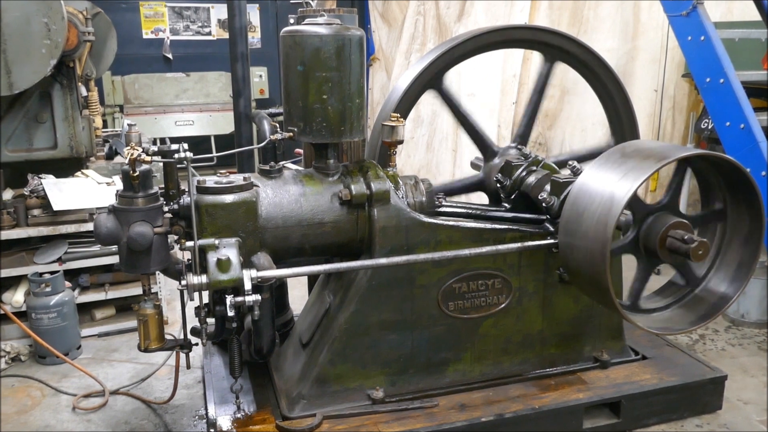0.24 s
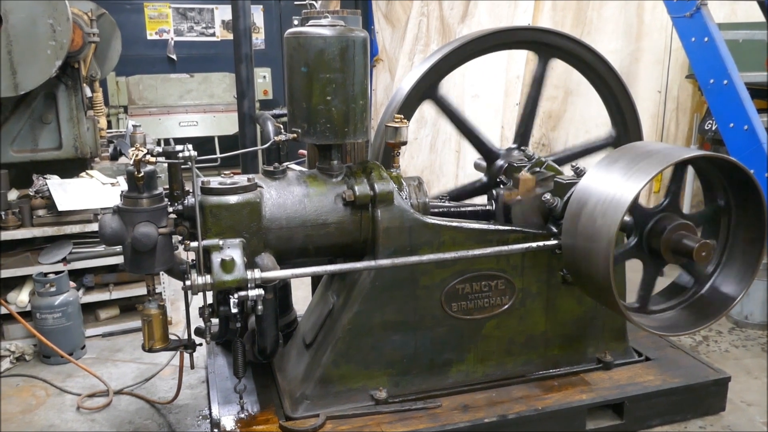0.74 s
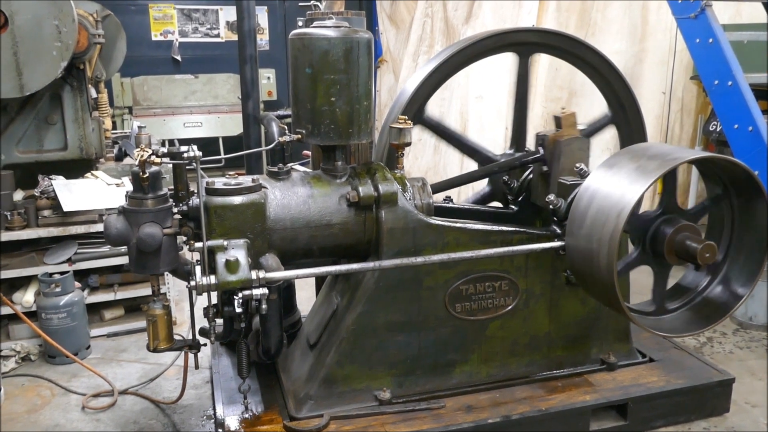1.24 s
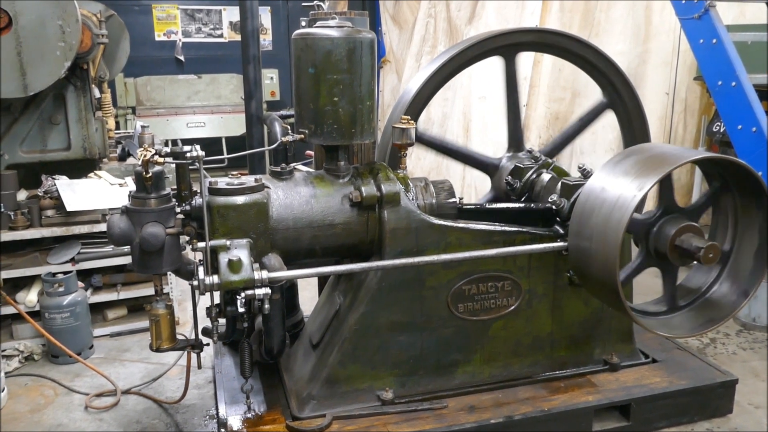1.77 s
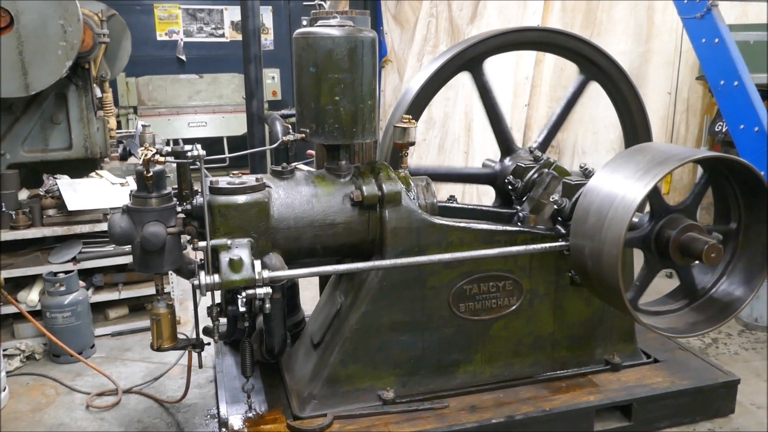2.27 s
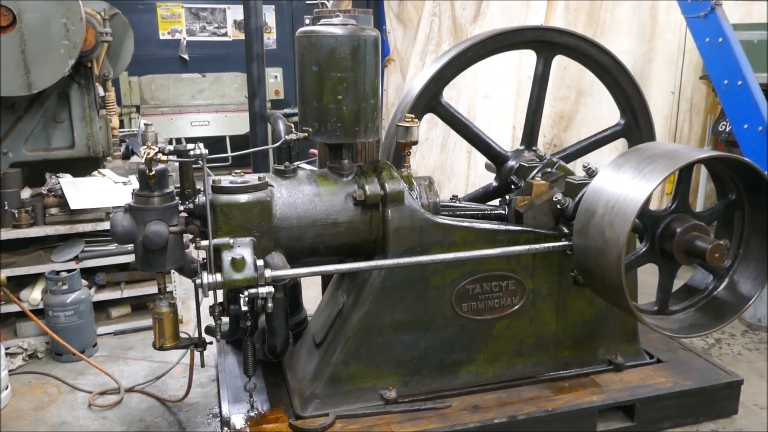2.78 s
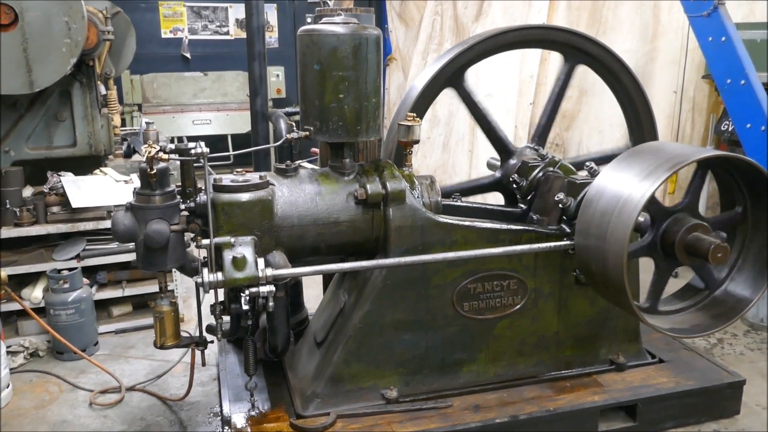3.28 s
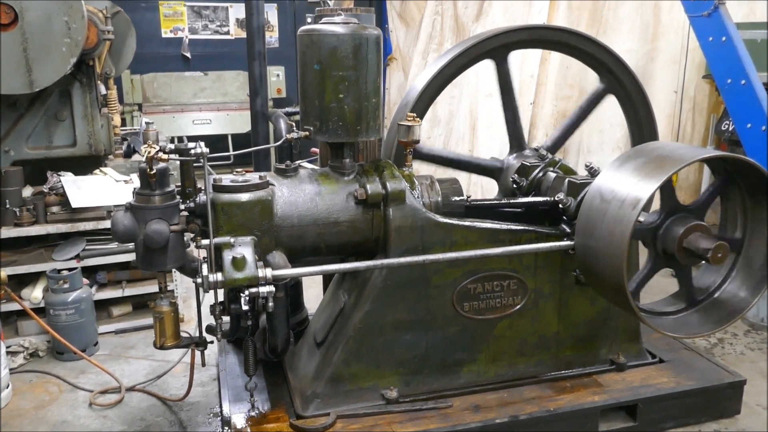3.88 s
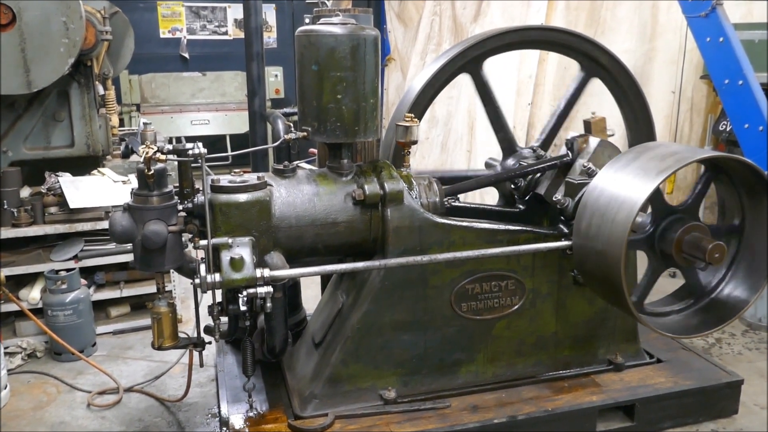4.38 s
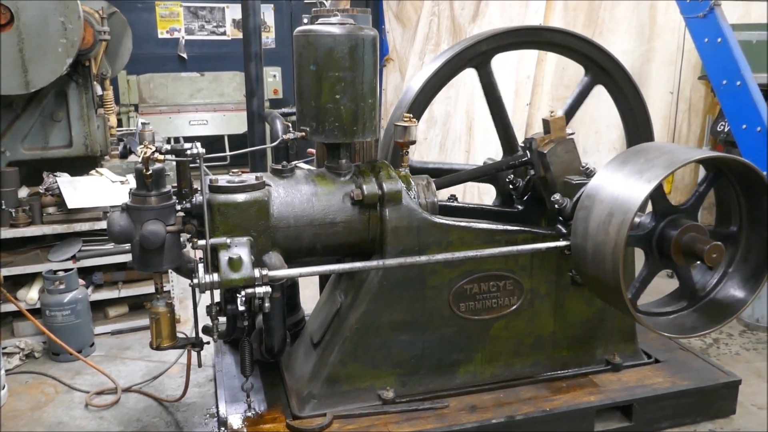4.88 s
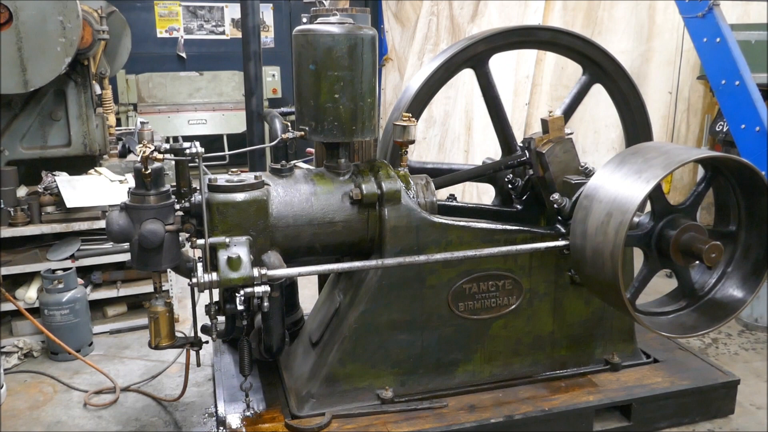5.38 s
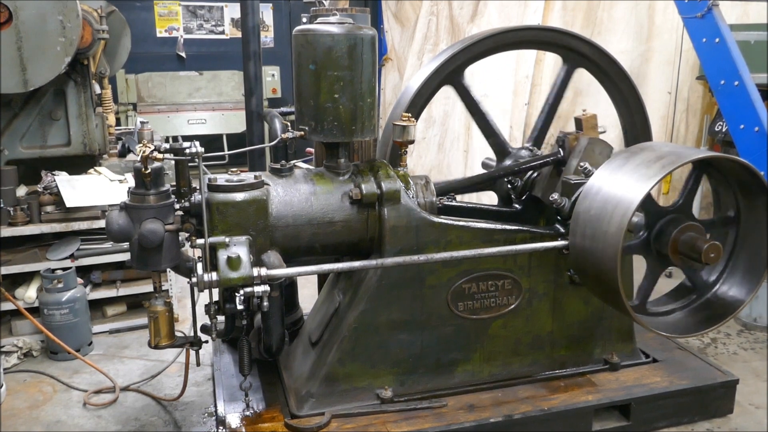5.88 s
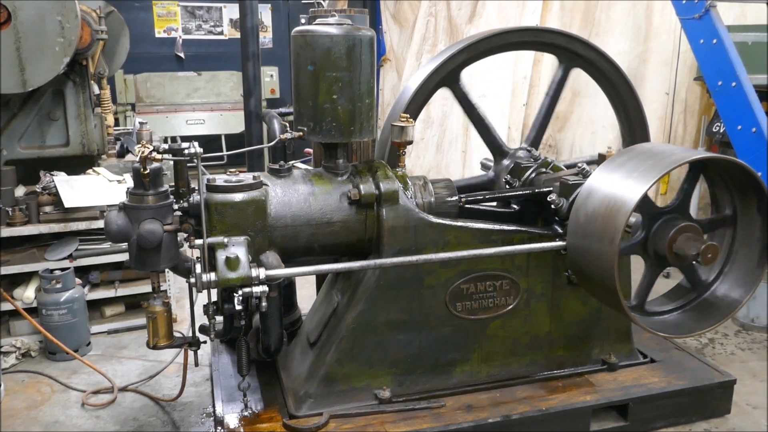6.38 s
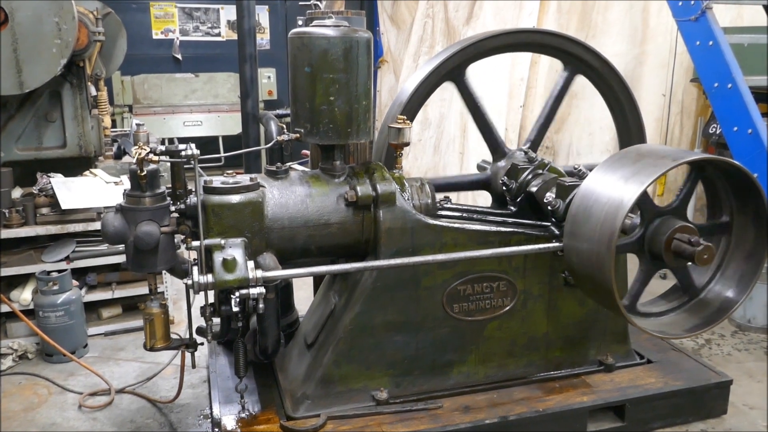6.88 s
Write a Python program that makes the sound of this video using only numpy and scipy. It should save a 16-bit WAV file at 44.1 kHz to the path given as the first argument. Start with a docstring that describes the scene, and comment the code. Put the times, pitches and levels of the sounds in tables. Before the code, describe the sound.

One loud metal clank, then uneven wheezy puffs, a juddering thump and soft knocks from a slowly rocking iron engine in an echoing workshop.

```python
"""Iron engine in a workshop

A big single-cylinder engine rocks slowly against the air squeezed inside it. Air wheezes and chuffs
through the valve ports and a leak hisses thinly. The linkage clanks, small parts tick, weight thumps
onto the engine's bed and the bearings knock. The hall draws every sound out over its steady hum."""
import sys
import numpy as np
from scipy import signal
from scipy.fft import rfft, irfft, next_fast_len
from scipy.io import wavfile
from scipy.ndimage import uniform_filter1d

SR = 44100
rng = np.random.default_rng(int(sys.argv[2]) if len(sys.argv) > 2 else 0)


def to_wav(s):
    """Save 16-bit WAV."""
    ch = np.atleast_2d(s).T  # columns
    pcm = np.round(np.clip(ch, -1, 1) * 32767)  # PCM
    wavfile.write(sys.argv[1], SR, pcm.astype(np.int16))


N = 314874


def gain_of(db):
    """Turns decibels into a number to multiply by."""
    return 10 ** (np.asarray(db) / 20)


def evened(x):
    """Scales a signal to an average strength (rms) of 1."""
    return x / np.sqrt(np.mean(x ** 2) + 1e-20)


def read(points, hz):
    """Looks up the value at a pitch, sliding between a table's rows."""
    pitches, values = np.transpose(points)
    return np.interp(np.log(hz + 1), np.log(pitches + 1), values)


def coloured(x, colour):
    """Turns each pitch in x up or down by the factor colour(hz)."""
    size = next_fast_len(x.shape[-1])
    return irfft(rfft(x, size) * colour(np.fft.rfftfreq(size, 1 / SR)), size)[..., :x.shape[-1]]


def noise(colour, size=N):
    """Random noise of strength 1 in the given tone colour."""
    return evened(coloured(rng.standard_normal(size), colour))


def curve(points):
    """A tone colour drawn through rows of pitch_hz, level_db."""
    return lambda hz: gain_of(read(points, hz))


def resonant(peaks, body, body_db):
    """A tone colour with peaks standing out of a broad body."""
    def colour(hz):
        peak_power = sum(gain_of(2 * db) / (1 + (2 * (hz - pitch) / width) ** 2) ** 2
                         for pitch, width, db in peaks)
        return np.sqrt(gain_of(read(body, hz) + body_db) ** 2 + peak_power)
    return colour


def wobble(ms):
    """A random wobble of strength 1 that changes within about ms milliseconds."""
    size = max(round(ms * SR / 1000), 2)
    return evened(uniform_filter1d(uniform_filter1d(rng.standard_normal(N), size), size))


def swell(start, rise, hold, fade_db_per_s):
    """Power that swells, holds, then fades away."""
    t = np.arange(N) / SR - start
    rising = np.clip(t / max(rise, .002), 0, 1) ** 2
    return (rising * gain_of(-fade_db_per_s * np.maximum(t - rise - hold, 0))) ** 2


def ring(notes, t, swell_s=0.04):
    """Ringing iron: tones swell in and die. Here and below, decay_s is the time to fall 60 dB."""
    tones = sum(gain_of(db - 60 * t / decay_s) * np.sin(2 * np.pi * hz * t) for hz, db, decay_s in notes)
    return tones * (1 - np.exp(-t / swell_s))


def add(mix, start_s, sound):
    """Mixes a sound in at its start time."""
    part = mix[round(start_s * SR):][:len(sound)]
    part += sound[:len(part)]


# Pitches the valve ports favour: pitch_hz, width_hz, level_db
PORT_PEAKS = [(695, 45, -6.5), (1180, 57, -3.5), (1414, 150, -3.5), (1604, 220, -7.5), (2195, 300, -11),
              (2565, 167, -6), (3770, 410, -16.5), (4470, 150, -21.5), (4724, 270, -15.5),
              (5370, 140, -21.5)]
# The rush of air between those peaks: pitch_hz, level_db
PORT_RUSH = [(180, -20), (300, -5.5), (675, -1.5), (923, -0.5), (1420, 2), (2540, -2.5), (3010, -7.5),
             (4610, -8.5), (7370, -27.5), (9000, -33), (11700, -41), (19800, -120)]
PORT_COLOUR = resonant(PORT_PEAKS, PORT_RUSH, body_db=-7)
# Tone of the shaking frame: pitch_hz, level_db
FRAME_RUMBLE = [(20, -18), (40, -11), (65, -6), (90, -25.5), (113, 1), (151, -2.5), (230, 5.5), (320, -5),
                (700, 1), (1000, -7.5), (1600, -92)]
# Pushes of the piston: start_s, rise_s, hold_s, fade_db_per_s, air_db, rumble_db
PUSHES = [(0.0, 0.0014, 0.0033, 135, -30, -33.5), (0.17, 0.046, 0.0086, 300, -46.5, -59),
          (0.381, .01, 0.0042, 114, -42.5, -44.5), (0.9, 0.044, 0.043, 63, -35, -37),
          (1.039, 0.078, 0.006, 221, -29.5, -38), (1.202, 0.04, 0.12, 502, -31.5, -37.5),
          (1.39, 0.086, 0.0046, 65, -35, -38), (2.28, 0.028, 0.19, 65, -41.5, -56.5),
          (2.7, .12, 0.097, 38, -49.5, -53.5), (3.354, 0.018, 0.0044, 117, -43, -44.5),
          (3.59, 0.074, .005, 168, -28, -33.5), (3.732, 0.079, .005, 150, -31.5, -53),
          (6.161, 0.095, 0.0043, 283, -38.5, -36.5)]

def wheezes():
    """Each push of the piston drives swirling air through the ports and shakes the frame."""
    air_power, rumble_power = sum(swell(*row[:4]) * gain_of(row[4:])[:, None] ** 2 for row in PUSHES)
    swirl = rng.standard_normal(N) * gain_of(1.37 * wobble(ms=7.6))
    air = evened(coloured(swirl, PORT_COLOUR))
    return np.sqrt(air_power) * air + np.sqrt(rumble_power) * noise(curve(FRAME_RUMBLE))


# Hiss of a wide gap: pitch_hz, level_db
WIDE_GAP = [(5000, -7), (7000, -2.5), (9000, 0.5), (10500, 3.5), (12000, -8.5), (15500, -23)]
# Faint whistles in that hiss: pitch_hz, width_hz, level_db
GAP_WHISTLES = [(9030, 180, 7), (10100, 150, -7.5), (11700, 140, 2.5)]
# Brighter hiss of a narrow gap: pitch_hz, level_db
NARROW_GAP = [(8000, -25), (10500, 3), (12500, 5), (13800, 6), (15500, -11)]
# Puffs of the leak: start_s, rise_s, hold_s, fade_db_per_s, level_db, brightness (0 to 1)
LEAK_PUFFS = [(0.0, 0.0014, .005, 200, -52, 0.03), (0.073, 0.073, .005, 195, -56.5, .2),
              (0.377, .012, .005, 92.5, -54.5, 0.15), (0.921, 0.04, .03, 170, -38, .1),
              (1.028, 0.091, 0.0056, 234, -35, 0.12), (1.193, 0.044, 0.12, 201, -39.5, 0.1),
              (1.405, 0.026, 0.039, 97, -44.5, 0.1), (1.585, 0.033, .01, 152, -56, .4),
              (2.284, 0.013, 0.008, 151.5, -49.5, .3), (2.33, 0.033, 0.21, 23, -60, 0.26),
              (2.65, 0.15, 0.09, 58, -58, .3), (3.363, .04, .005, 130, -52.5, .4),
              (3.584, 0.036, .01, 200, -40, 0.12), (3.635, 0.018, .01, 260, -38, 0.3),
              (3.705, 0.077, .005, 100, -48, 0.16), (6.157, 0.035, .03, 202, -52, 0.44),
              (6.27, 0.022, .02, 151, -56, 0.4), (6.4, 0.026, .005, 293, -55, 0.93)]

def leak():
    """Air escapes in fluttering puffs; brighter ones use more of the narrow gap."""
    narrow_power = wide_power = 0
    for *timing, db, brightness in LEAK_PUFFS:
        power = swell(*timing) * gain_of(db) ** 2
        narrow_power += power * brightness
        wide_power += power * (1 - brightness)
    wide = np.sqrt(wide_power) * noise(resonant(GAP_WHISTLES, WIDE_GAP, body_db=0))
    narrow = np.sqrt(narrow_power) * noise(curve(NARROW_GAP))
    return (wide + narrow) * gain_of(1.9 * wobble(ms=5.4))


# Tone of the workshop's hum: pitch_hz, level_db
SHOP_HUM = [(15, -80.5), (25, -34), (69, -36.5), (86, -4.5), (119, -10.5), (152, -3.5), (365, -8),
            (618, -8), (838, -10.5), (1010, -7.5), (1390, -16.5), (2560, -23), (3200, -41), (4160, -72.5),
            (7040, -120)]
# Tone of the faint background hiss: pitch_hz, level_db
FAINT_HISS = [(1760, -32), (3000, -4), (3350, 1), (4320, -1), (5920, -8), (6610, -10), (8350, -8),
              (9780, 0.5), (15500, -6)]
HUM_DB, HISS_DB = -53.5, -73.5

def hum():
    """The shop's hum, drifting a little, and a steady hiss, for the middle and the sides."""
    shop = gain_of(HUM_DB) * noise(curve(SHOP_HUM), (2, N))
    hiss = gain_of(HISS_DB) * noise(curve(FAINT_HISS), (2, N))
    return shop * gain_of(.7 * wobble(ms=90)) + hiss


# Pitches the linkage favours: pitch_hz, width_hz, level_db
LINKAGE_PEAKS = [(242, 35, 1), (524, 173, 1), (809, 25, -16), (1049, 9.9, -3.5), (1290, 72, -2),
                 (1499, 77, -8.5), (2103, 150, -6), (3500, 54, -25)]
# Broad tone of its rattle: pitch_hz, level_db
LINKAGE_TONE = [(47, -64), (80, -31), (109, -10.5), (234, -4.5), (318, -11.5), (363, 2), (833, -7),
                (1010, -4.5), (2400, -15.5), (3200, -23), (5980, -39), (15000, -47)]
# Notes of the flywheel: pitch_hz, level_db, decay_s
FLYWHEEL_NOTES = [(233, 9.5, 1.3), (410, -15, 0.96), (479, 2.5, 0.34), (960, -20, 0.57), (1257, -0.5, 0.45),
                  (1635, -7.5, 0.74), (1960, -7.5, 0.9)]
# Clanks of the linkage: start_s, crack_db, rattle_db, rattle_decay_s, ring_db
LINKAGE_CLANKS = [(0.388, -42, -59, 0.16, -81), (0.392, -35.5, -48, 0.12, -71.5),
                  (0.5446, -8.5, -16, 0.45, -37), (3.374, -37, -39, 0.46, -70.5)]

def clanks():
    """The linkage cracks sharply; its joints rattle on, the bass blooms later and the flywheel rings."""
    out, t = np.zeros(N), np.arange(32768) / SR
    click = signal.unit_impulse(512, 140)
    crack = coloured(click, lambda hz: np.exp(-(np.log((hz + 1) / 1750) / .38) ** 2))
    clatter = 1 + 4.4 * np.exp(-t / 0.0091)  # the first bounces are the hardest
    for start_s, crack_db, rattle_db, decay_s, ring_db in LINKAGE_CLANKS:
        joints = noise(resonant(LINKAGE_PEAKS, LINKAGE_TONE, body_db=0.92), len(t))
        bass = coloured(joints, lambda hz: 1 / (1 + (hz / 1200) ** 4))
        treble = (joints - bass) * clatter * (1 - np.exp(-t / 0.00099))
        rattle = treble + bass * (1 - np.exp(-(t / 0.025) ** 2))
        add(out, start_s, gain_of(crack_db) * crack / abs(crack).max())
        add(out, start_s, gain_of(rattle_db - 60 * t / decay_s) * rattle)
        add(out, start_s, gain_of(ring_db) * ring(FLYWHEEL_NOTES, t))
    return out


# Light ticks of loose parts: start_s, level_db, pitch_hz, decay_s
PART_TICKS = [(0.869, -60.5, 8900, 0.36), (2.163, -61.5, 11000, 0.12), (4.784, -57, 11900, 0.14),
              (4.95, -59.5, 5000, 0.056), (5.596, -74, 8950, 0.071)]

def ticks():
    """Small loose parts touch: a crisp start and a short fizz."""
    out, t = np.zeros(N), np.arange(4096) / SR
    crisp_start = 1 + 1.15 * np.exp(-t / 0.0021)
    for start_s, db, pitch_hz, decay_s in PART_TICKS:
        fizz = noise(lambda hz: np.exp(-(np.log((hz + 1) / pitch_hz) / 0.65) ** 2), len(t))
        add(out, start_s, gain_of(db - 60 * t / decay_s) * fizz * crisp_start)
    return out


# Notes of the valve, relative to its chuff: pitch_hz, level_db, decay_s
VALVE_NOTES = [(1431, -4, 0.15), (2605, -13.5, .15), (4740, -13.5, .1)]
# Chuffs of air: start_s, level_db, rise_s, length_s, brightness_db_per_octave
AIR_CHUFFS = [(0.9684, -19.5, 0.0032, 0.026, 2.5), (1.054, -22.5, 0.0058, 0.023, 1.5),
              (1.115, -18, 0.0082, 0.018, 7.5), (1.256, -25, 0.011, 0.052, 4.5),
              (1.342, -20, .007, 0.018, 11), (1.4286, -26.5, 0.0037, 0.033, 4.5),
              (1.505, -32, 0.0077, 0.054, 4.5), (1.641, -32, 0.0073, 0.045, -0.5),
              (3.636, -22.5, 0.0063, 0.039, 4), (3.797, -31.5, 0.0041, 0.061, -0.5),
              (4.077, -34, .01, 0.031, -7), (6.218, -30.5, 0.0058, 0.063, 1), (6.262, -44, .005, 0.028, 9),
              (6.332, -38, 0.0023, 0.084, -2)]

def chuffs():
    """A valve rings as it lets a short burst of air out through the ports."""
    out, t = np.zeros(N), np.arange(8192) / SR
    for start_s, db, rise_s, length_s, brightness in AIR_CHUFFS:
        burst = noise(lambda hz: PORT_COLOUR(hz) * gain_of(brightness * np.log2((hz + 50) / 2000)), len(t))
        shape = (1 - np.exp(-(t / rise_s) ** 2)) * np.exp(-(t / length_s) ** 1.64)
        add(out, start_s, gain_of(db) * (shape * burst + ring(VALVE_NOTES, t, rise_s)))
    return out


# Pitches the bed (the engine's base) favours: pitch_hz, width_hz, level_db
BED_PEAKS = [(150, 37, -28), (416, 380, 1.5), (890, 330, 2), (1610, 18, -33.5), (1880, 130, -12),
             (2176, 98, -9), (2450, 290, -17.5)]
# Broad tone of the bed: pitch_hz, level_db
BED_TONE = [(35, -58), (60, -21), (143, 9), (303, -6), (396, 9.5), (561, -7), (857, -4), (1260, -10),
            (4850, -39), (6000, -47), (7800, -61), (13200, -120)]
# Notes of the bed after a landing: pitch_hz, level_db, decay_s
BED_NOTES = [(145.7, -8, 0.91), (353.6, 0.5, 0.57), (390.5, 12, 0.2)]
# Thumps: start_s, landing_db, judder_db, judder_length_s, brightness_db_per_octave
BED_THUMPS = [(2.279, -26.5, -23.5, 0.243, 2), (4.096, -46, -59, 0.018, 1), (4.429, -56, -51, 0.04, 4)]

def thumps():
    """The weight lands on the bed, which judders for a moment and rings."""
    out, t = np.zeros(N), np.arange(SR) / SR
    bed = resonant(BED_PEAKS, BED_TONE, body_db=-1.5)
    for start_s, landing_db, judder_db, length_s, brightness in BED_THUMPS:
        landing = gain_of(landing_db) * t / 0.008 * np.exp(1 - t / 0.011)
        judder = gain_of(judder_db - 49 * t) * (1 - np.exp(-t / 0.0034))
        judder *= np.clip((length_s - t) / 0.018, 0, 1)
        thud = noise(lambda hz: bed(hz) * gain_of(brightness * np.log2((hz + 50) / 400)), len(t))
        add(out, start_s, np.hypot(landing, judder) * thud + gain_of(landing_db) * ring(BED_NOTES, t))
    return out


def loudness(rows):
    """Joins rows of time_s, level_db into a volume curve that fades in and out at the ends."""
    t = np.arange(N) / SR
    times, db = np.transpose(rows)
    fade = np.clip(np.minimum((t - times[0]) / 0.004, (times[-1] - t) / 0.0093), 0, 1)
    return fade * gain_of(np.interp(t, times, db))


# Pitches the inlet pipe favours: pitch_hz, width_hz, level_db
INLET_PEAKS = [(143.6, 5.5, 7), (324, 24, 0.5), (1060, 120, -10), (1700, 51, -6), (2110, 78, -13),
               (2590, 390, -7), (2770, 44, -8)]
# Broad tone of the air in it: pitch_hz, level_db
INLET_TONE = [(53, -38), (90, -15), (139, -0.5), (250, -60), (322, -12), (731, -36), (877, -2.5),
              (1600, -4), (7000, -25), (9100, -43), (15400, -120)]
# One slow stroke drawing air in: time_s, level_db
INTAKE_STROKE = [(2.45, -44), (2.6, -45.5), (2.8, -42), (3.0, -42), (3.1, -51.5), (3.3, -59)]
# A faint rush while the shaft coasts: time_s, level_db
COASTING_RUSH = [(4.3, -68.5), (4.45, -68.5), (4.6, -62.5), (4.72, -60.5), (4.8, -57), (4.919, -64),
                 (5.1, -66.5), (5.3, -69), (5.601, -64)]

def intake():
    """A long breath through the inlet pipe, then a far weaker one while the shaft coasts."""
    breath = noise(resonant(INLET_PEAKS, INLET_TONE, body_db=-3.5))
    return (loudness(INTAKE_STROKE) + loudness(COASTING_RUSH)) * breath


# Soft, low knocks while the shaft coasts: start_s, level_db, pitch_hz
BEARING_KNOCKS = [(4.784, -48.5, 212), (4.84, -46.5, 221), (5.041, -36.5, 374), (5.062, -42, 288),
                  (5.133, -43, 280), (5.19, -45, 93), (5.245, -43, 159.6)]
KNOCK_RISE_S, KNOCK_CYCLES = 0.0042, 31  # a knock falls 60 dB in this many vibrations

def knocks():
    """Slack in the bearings closes up with a dull, short note."""
    out, t = np.zeros(N), np.arange(16384) / SR
    for start_s, db, hz in BEARING_KNOCKS:
        shape = (1 - np.exp(-(t / KNOCK_RISE_S) ** 2)) * gain_of(db - 60 * t * hz / KNOCK_CYCLES)
        add(out, start_s, shape * np.sin(2 * np.pi * hz * t))
    return out


# How long the hall echoes: pitch_hz, decay_s
ECHO_DECAY = [(100, 1.86), (400, 1.67), (1500, 1.4), (4000, 1.15), (8000, 0.78), (14000, 0.63)]
# How loud the echo is next to the direct sound: pitch_hz, level_db
ECHO_LEVEL = [(100, 4), (500, 1.5), (2000, 0), (5000, -3), (10000, -6.5)]

def hall(x):
    """Many reflections blur into an echo, for the middle and the sides; high pitches die first."""
    delay, spacing = 200, 20  # samples
    reflections = np.zeros((2, 2 * SR))
    slots = np.arange(delay, 2 * SR - spacing, spacing)
    arrivals = slots + rng.integers(0, spacing, (2, len(slots)))
    np.put_along_axis(reflections, arrivals, rng.choice([-1., 1.], arrivals.shape), 1)
    hz, t, bands = signal.stft(reflections, SR, nperseg=256)
    bands *= gain_of(-60 * t / read(ECHO_DECAY, hz)[:, None])
    bands /= np.linalg.norm(bands[0], axis=1)[:, None]  # the same energy in every band
    tail = signal.istft(bands, SR, nperseg=256)[1]
    tail[:, :delay] = 0
    tail = coloured(tail / np.linalg.norm(tail[0]), curve(ECHO_LEVEL))
    return signal.fftconvolve(x[None], tail, axes=1)[:, :N]


# Stereo width, as how far the sides are turned down: pitch_hz, level_db
SIDE_LEVEL = [(60, -12), (150, -14.5), (380, -12), (950, -8), (2380, -12.5), (5980, -1.5), (15000, -1)]

def scene():
    """The engine stands in the middle; near reflections, echo and hum fill the sides."""
    low_cut = signal.butter(2, 91, "high", fs=SR, output="sos")  # thins the deep bass of engine and bed
    engine = signal.sosfilt(low_cut, wheezes() + leak() + clanks() + ticks() + chuffs() + intake())
    bed = signal.sosfilt(low_cut, thumps() + knocks())
    direct = engine + bed
    near = rng.standard_normal(800) * np.exp(-np.arange(800) / 50)  # scatter off the benches close by
    middle, side = hall(engine + 0.34 * bed) + hum()  # the bed sends more into the floor than the hall
    side += 0.81 * signal.oaconvolve(direct, near / np.linalg.norm(near))[:N]
    side = coloured(side, curve(SIDE_LEVEL))
    return np.array([direct + middle + side, direct + middle - side])


TREBLE_LIMIT_HZ = 15650

def record(dry):
    """Cuts off the very highest treble."""
    high_cut = signal.firwin(511, TREBLE_LIMIT_HZ, window=("kaiser", 9), fs=SR)
    return signal.oaconvolve(dry, high_cut[None], "same")


dry = scene()
out = record(dry)
to_wav(out)
```